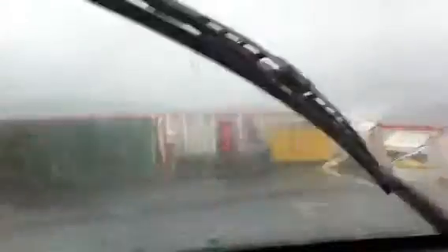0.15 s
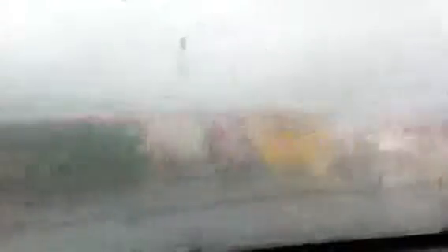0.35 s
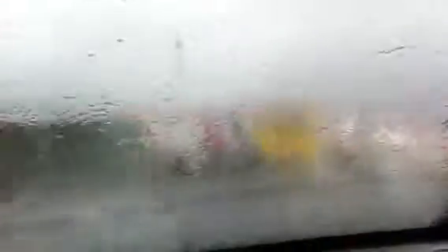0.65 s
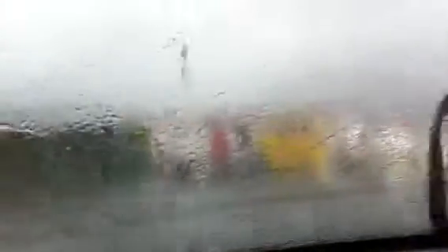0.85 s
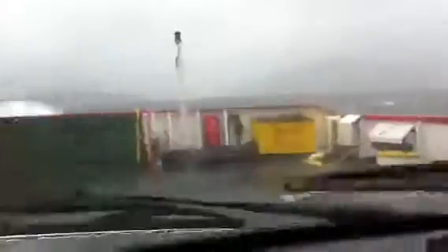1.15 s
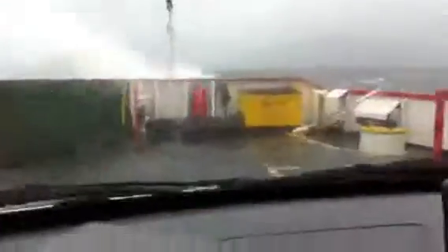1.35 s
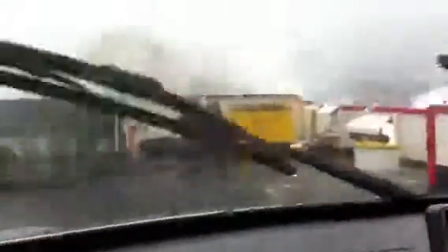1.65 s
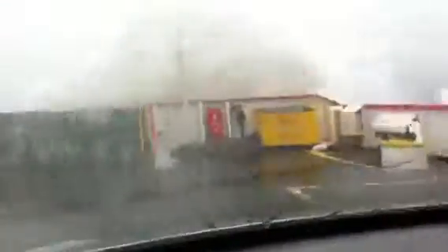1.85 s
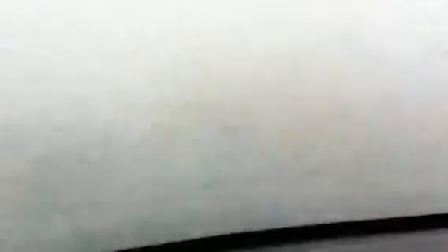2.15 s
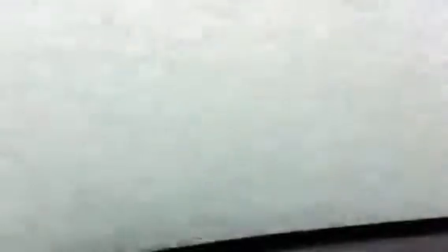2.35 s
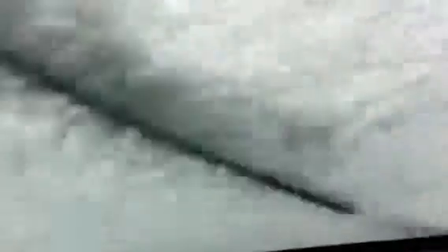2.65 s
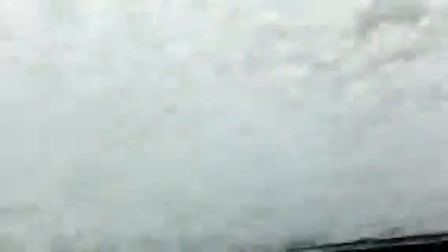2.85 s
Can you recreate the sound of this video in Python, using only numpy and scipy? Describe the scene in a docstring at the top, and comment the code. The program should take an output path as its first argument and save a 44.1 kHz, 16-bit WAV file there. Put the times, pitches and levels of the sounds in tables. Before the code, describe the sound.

Inside a car on a ferry deck, sea spray hisses across the windscreen, thins to scattered droplets and wiper knocks, then a heavier sheet slams the glass and drums on the body over a low ship's hum.

```python
"""Sea spray on a windscreen, heard inside a car on a ferry deck in a storm: two sheets hit the glass.
Spray is a dense random train of impacts coloured by the glass; large drops are short noise splats.
The second sheet brings heavy slugs of water that slap the glass, drum on the body and boom in the roof.
Wipers thump at each turn (decaying modes plus scuff) over the ship's low hum (coloured noise and bands).
One microphone in the car: the water has a short cabin tail, and both channels are alike."""
import sys
import numpy as np
from scipy import signal
from scipy.io import wavfile
from scipy.ndimage import uniform_filter1d

SR = 44100
rng = np.random.default_rng(int(sys.argv[2]) if len(sys.argv) > 2 else 0)


def volts(x):
    """Linear amplitude factor 10**(x/20) for a level x in dB, scalar or array-like."""
    e = np.asarray(x, float) / 20
    return 10 ** e


def unload_audio(sound):
    """Save the sound as a 16-bit wav file, at the path given as the first command line argument."""
    columns = np.transpose(np.atleast_2d(sound))
    # keep every value between -1 and 1, then stretch to whole-number steps
    steps = np.round(np.clip(columns, -1, 1) * 32767)
    wavfile.write(sys.argv[1], SR, steps.astype(np.int16))


N = 132300  # samples, 3 s

# ship's hum through the car, relative spectrum: f/Hz, density/(dB per Hz)
HUM_SPECTRUM = [(12, -83), (20, -67), (76, -5.5), (93, -14.5), (113, 4.5), (222, -2.5), (254, -1),
                (303, -11), (327, -10), (499, -12), (540, -23), (617, -18.5), (2000, -35.5), (2600, -80),
                (4400, -120)]
HUM_LEVEL_DB = -36.5 - 5
# steady fuzzy bands of the hum: f/Hz, width/Hz, level/dB
HUM_BANDS = [(297.5, 13, -50.5), (407.5, 12, -67.5), (505.7, 31, -54)]
# the two lowest bands waver in strength, often together: t/s, lower level/dB, upper level/dB
HUM_LOW_LEVELS = [(0.0, -75, -34), (0.08, -46, -45), (0.15, -64, -75), (0.21, -37, -53), (0.25, -51, -38),
                  (1.12, -40, -39.5), (1.14, -49, -53), (1.36, -41, -40), (1.4, -60, -51),
                  (2.08, -37.5, -44), (2.2, -79, -69), (2.31, -22, -42), (2.36, -40, -50), (2.4, -51, -40)]
# place of those two bands: f/Hz, width/Hz, trim added to the level/dB
HUM_LOW_BANDS = [(106.8, 10, -2), (153.7, 29, -1.5)]
HUM_WAVER_DB, HUM_WAVER_S = -1, 0.047  # drift of each band; averaging time

# fine spray on the glass: t/s, level/dB, treble against it/dB, low part against it/dB
SPRAY = [(0, -58, -5, -3), (.1, -57.5, -9, -4), (.16, -46.5, -8, -5.5), (.2, -40.5, -10, -8),
         (.22, -36.5, -9.5, -5.5), (.265, -32, -9, -4), (.29, -34.5, -12, -4.5), (.33, -30.5, -7.5, -6),
         (.41, -27.5, -9, -6.5), (.44, -29.5, -3, -5), (.49, -25.5, -8.5, -5), (.535, -30, -7, -3),
         (.555, -25.5, -7.5, -5), (.63, -28.5, -10, -5), (.66, -33, -11, -4), (.69, -41.5, -8, 5),
         (.735, -46, -9.5, -4), (.8, -49.5, -3, -1.5), (.825, -41.5, -10, -2), (.86, -49.5, -3, -5.5),
         (1.3, -47, -8, -4.5), (1.54, -53, -9, 1), (1.64, -53.5, -5, 0.5), (2, -51.5, -5.5, -7.5),
         (2.13, -51, -1.5, 2), (2.18, -43.5, -8.5, -4), (2.21, -35.5, -5, -3), (2.225, -28.5, -8, -5.5),
         (2.26, -25.5, -4.5, -4), (2.36, -28, -1, -1.5), (2.41, -24.5, -0.5, -6.5), (2.46, -20.5, -5, 2),
         (2.515, -27, 1, 5), (2.61, -24.5, -4.5, 1), (2.645, -27, -5, 0), (2.7, -27.5, -4, 0),
         (2.81, -24.5, -6, 1), (2.845, -30, -4, 1), (2.93, -31, -4, 1), (3, -26, -7, 1)]
# colour of a droplet heard through the glass: f/Hz, relative density/(dB per Hz)
GLASS_COLOUR = [(88, -25), (150, -3.5), (231, -9), (361, -1.5), (414, -4.5), (504, -4), (905, -8),
                (998, -6.5), (1530, -8), (2870, -7.5), (5680, -14), (11500, -17.5), (16000, -25.5)]
# handfuls of droplets between the sheets: t/s, boost/dB (half to level, half to treble), length/s
SPRINKLES = [(0.754, 7, 0.021), (0.956, 7, 0.024), (1, 6, 0.022), (1.181, 8.5, 0.021),
             (1.212, 13.5, 0.0091), (1.5, 6.5, 0.05), (1.557, 9.5, 0.02), (1.68, 3, .02), (1.77, 5, 0.015),
             (1.926, 5.5, 0.026)]
SPRINKLE_RISE_S = 0.0042
DROPLETS_PER_S, DROPLET_SPREAD_DB = 10000, 1.5
GUST_DB, GUST_S = 1.0, 0.015  # rms drift of the spray level; averaging time
TREBLE_REF_DB, TREBLE_FROM_HZ = -4.5, 4700  # the table's treble value that leaves the colour as it is
LOW_REF_DB, LOW_UNDER_HZ = -2, 1600  # likewise for the low part
PANE_HZ, PANE_WIDTH_HZ, PANE_DB = 2545, 416, -11.5  # broad ring of the windscreen

# wiper knocks, two at each turn: t/s, level/dB, slope over the modes/(dB per octave),
# scuff against the knock/dB
WIPER_KNOCKS = [(.026, -31, -0.5, -12), (0.048, -33, -1, -11), (0.8193, -21.5, 3.5, -20),
                (.827, -14.5, -13, -35), (1.607, -23.5, -8.5, -15.5), (1.641, -28.5, -6, -32)]
# modes of a knock: f/Hz, level/dB, t60/s
WIPER_MODES = [(180.3, -4.5, 0.24), (288.6, -6.5, 0.14), (387, -12, 0.1), (466, -6.5, 0.049),
               (542, -12, 0.14), (620, -16, 0.076)]
WIPER_RISE_CYCLES = 1.1
SCUFF_RISE_S, SCUFF_T60_S, SCUFF_HZ, SCUFF_WIDTH_HZ = 0.005, 0.08, 1350, 1300

# single large drops: t/s, level/dB before the common trim
DROPS = [(0.2706, -21.5), (0.3192, -13.5), (1.2424, -31.5), (1.277, -31), (1.3175, -32), (1.3583, -32)]
DROP_T60_S, DROP_TRIM_DB, DROP_LOW_HZ, DROP_TOP_HZ = 0.019, -3.5, 3500, 11000

# heavy water: t/s, drum on the body level/dB, boom of the roof level/dB,
# slap on the glass level/dB before its trim
SLUGS = [(2.38, -38, -51, -28), (2.412, -35, -27, -24), (2.454, -22, -30, -25), (2.49, -20, -40, -12),
         (2.516, -16.5, -29, -22.5), (2.548, -25.5, -24.5, -12.5), (2.584, -19, -20.5, -24),
         (2.636, -22.5, -31.5, -24.5), (2.65, -23, -23.5, -27), (2.818, -15, -16, -29),
         (2.85, -22.5, -22.5, -25), (2.936, -23.5, -30, -31), (2.978, -22, -23, -24),
         (3.0, -17.5, -33, -28)]
# colour of the drumming body: f/Hz, relative density/(dB per Hz)
BODY_COLOUR = [(47, -47), (80, -46), (157, -13), (288, 0.5), (319, -4), (360, -1.5), (546, -5), (950, -7),
               (1020, -11.5), (2780, -22), (5000, -29), (6500, -63), (11000, -120)]
SLUGS_PER_S, SLUG_SPREAD_DB, SLUG_RISE_DB_PER_S = 2200, 1.5, 245
BOOM_HZ, BOOM_WIDTH_HZ = 162, 36
SLAP_HZ, SLAP_WIDTH_HZ, SLAP_TRIM_DB = 1200, 2200, -5

# the heaviest load of water ends in a boom that sinks in pitch: t/s, f/Hz, level/dB
SINKING = [(2.7, 380, -45), (2.76, 350, -25), (2.81, 310, -21), (2.85, 210, -22), (2.89, 140, -27),
           (2.93, 110, -50)]
SINKING_WIDTH_HZ = 93

WATER_LOW_HZ = 101  # the water carries no deep bass
CABIN_T60_S, CABIN_DB = 0.07, -14


def evened(x):
    """Scales to rms 1."""
    return x / np.sqrt(np.mean(x ** 2) + 1e-20)


def curve(table, axis):
    """One column of a time table, interpolated per sample."""
    rows = np.array(table)
    return np.interp(np.arange(N) / SR, rows[:, 0], rows[:, axis])


def add(mix, s, sound):
    """Mixes a sound in at a time in seconds."""
    part = mix[round(s * SR):][:len(sound)]
    part += sound[:len(part)]


def butter(x, order, hz, kind):
    """Causal Butterworth filter."""
    return signal.sosfilt(signal.butter(order, hz, kind, fs=SR, output="sos"), x)


def butter_both_ways(x, hz, kind):
    """Second-order Butterworth run forwards and backwards, so the part stays in phase."""
    return signal.sosfiltfilt(signal.butter(2, hz, kind, fs=SR, output="sos"), x)


def colour(x, spectrum, size=8192):
    """Causal minimum-phase filter with the given spectrum."""
    f, db = np.transpose(spectrum)
    hz = np.abs(np.fft.fftfreq(size, 1 / SR))
    level_db = np.interp(np.log(hz + 1), np.log(f + 1), db)
    log_gain = np.log(volts(np.maximum(level_db, -100)))
    taps = np.fft.ifft(np.exp(np.conj(signal.hilbert(log_gain)))).real[:size // 2]
    return signal.oaconvolve(x, taps)[:N]


def resonate(x, hz, width):
    """A resonance of gain 1, fixed or moving, applied twice for steep sides."""
    turn = np.exp(2j * np.pi * np.cumsum(hz * np.ones(len(x))) / SR)
    r = np.exp(-np.pi * width / SR)
    # shift the resonance down to 0 Hz, smooth, shift back
    smooth = signal.lfilter([(1 - r) ** 2], [1, -2 * r, r * r], x / turn)
    return 2 * (turn * smooth).real


def wander(seconds):
    """Slow random drift of rms 1: noise averaged twice."""
    size = max(round(seconds * SR), 1)
    once = uniform_filter1d(rng.standard_normal(N), size)
    return evened(uniform_filter1d(once, size))


def impacts(per_s, spread_db):
    """Random train of impacts of either sign, a few of them large."""
    hit = rng.random(N) < per_s / SR
    size = rng.exponential(1, N)
    sign = rng.choice([-1., 1.], N)
    return hit * sign * volts(spread_db * np.minimum(size, 5))


def hum():
    """The ship's hum in the car: low rumble with a few fuzzy bands, each wavering."""
    out = volts(HUM_LEVEL_DB) * evened(colour(rng.standard_normal(N), HUM_SPECTRUM))
    low_bands = [(hz, width, trim_db + curve(HUM_LOW_LEVELS, axis=k + 1))
                 for k, (hz, width, trim_db) in enumerate(HUM_LOW_BANDS)]
    for hz, width, db in low_bands + HUM_BANDS:
        band = evened(resonate(rng.standard_normal(N), hz, width))
        out = out + band * volts(db + HUM_WAVER_DB * wander(HUM_WAVER_S))
    return out


def spray():
    """Dense droplets in small gusts, heard through the glass, with brightness that changes in time."""
    patter = colour(impacts(DROPLETS_PER_S, DROPLET_SPREAD_DB), GLASS_COLOUR)
    patter = patter + volts(PANE_DB) * resonate(patter, PANE_HZ, PANE_WIDTH_HZ)
    patter = patter / np.std(butter(patter, 4, [1800, 4000], "band"))  # rms 1 in this band
    t = np.arange(N) / SR
    boost_db = sum(db * np.clip((t - s) / SPRINKLE_RISE_S, 0, 1) * np.exp(-((t - s) / length) ** 2)
                   for s, db, length in SPRINKLES)
    treble = butter_both_ways(patter, TREBLE_FROM_HZ, "high")
    low = butter_both_ways(patter, LOW_UNDER_HZ, "low")
    treble_db = curve(SPRAY, axis=2) - TREBLE_REF_DB + boost_db / 2
    low_db = np.minimum(curve(SPRAY, axis=3) - LOW_REF_DB, 2)  # lifted by 2 dB at most
    tilted = patter + (volts(treble_db) - 1) * treble + (volts(low_db) - 1) * low
    return tilted * volts(curve(SPRAY, axis=1) + GUST_DB * wander(GUST_S) + boost_db / 2)


def knock(slope_db):
    """One knock on the glass: decaying sine modes, of which the low ones swell slower."""
    t = np.arange(SR // 4) / SR
    out = np.zeros(len(t))
    for k, (hz, db, t60) in enumerate(WIPER_MODES):
        octaves = np.log2(hz / WIPER_MODES[0][0])
        decay = volts(db + slope_db * octaves - 60 * t / t60)
        rise = np.minimum(t * hz / WIPER_RISE_CYCLES, 1)
        out += decay * rise * np.sin(2 * np.pi * hz * t + k * k)
    return out


def wipers():
    """At each turn the blades flip over with a double knock and a noisy scuff of rubber."""
    out, t = np.zeros(N), np.arange(SR // 4) / SR
    for s, db, slope_db, scuff_db in WIPER_KNOCKS:
        scuff = evened(resonate(rng.standard_normal(len(t)), SCUFF_HZ, SCUFF_WIDTH_HZ))
        scuff = scuff * np.minimum(t / SCUFF_RISE_S, 1) * volts(scuff_db - 60 * t / SCUFF_T60_S)
        add(out, s, volts(db) * (knock(slope_db) + scuff))
    return out


def large_drops():
    """Each large drop is a short bright splat of decaying noise."""
    out, t = np.zeros(N), np.arange(2000) / SR
    for s, db in DROPS:
        noise = rng.standard_normal(len(t))
        add(out, s, volts(db + DROP_TRIM_DB - 60 * t / DROP_T60_S) * noise)
    return butter(out, 1, [DROP_LOW_HZ, DROP_TOP_HZ], "band")


def slugs():
    """Lumps of water slap the glass, drum on the body panels and boom in the roof."""
    # a steep rise up to the first row of the table
    onset_db = SLUG_RISE_DB_PER_S * np.minimum(np.arange(N) / SR - SLUGS[0][0], 0)
    blows = impacts(SLUGS_PER_S, SLUG_SPREAD_DB)
    drum = evened(colour(blows, BODY_COLOUR)) * volts(curve(SLUGS, axis=1))
    boom = evened(resonate(blows, BOOM_HZ, BOOM_WIDTH_HZ)) * volts(curve(SLUGS, axis=2))
    slap = evened(resonate(blows, SLAP_HZ, SLAP_WIDTH_HZ)) * volts(curve(SLUGS, axis=3) + SLAP_TRIM_DB)
    return (drum + boom + slap) * volts(onset_db)


def sinking_boom():
    """Blows of water through a low resonance that slides down."""
    t = np.arange(N) / SR
    blows = impacts(SLUGS_PER_S, SLUG_SPREAD_DB)
    ring = evened(resonate(blows, curve(SINKING, axis=1), SINKING_WIDTH_HZ))
    sounding = (t > SINKING[0][0]) * (t < SINKING[-1][0])
    return ring * volts(curve(SINKING, axis=2)) * sounding


def cabin(x):
    """Short dense tail of the car interior: random echoes that die away."""
    t = np.arange(SR // 8) / SR
    echoes = rng.choice([-1., 1.], len(t)) * (rng.random(len(t)) < 0.3)
    tail = echoes * volts(-60 * t / CABIN_T60_S) * (t > 0.001)
    wet = volts(CABIN_DB)
    reverb = signal.oaconvolve(x, tail / np.linalg.norm(tail))[:N]
    return (x + wet * reverb) / np.sqrt(1 + wet ** 2)


def scene():
    """One microphone in the car: water with the cabin tail, wipers and hum without it."""
    water = spray() + slugs() + sinking_boom() + large_drops()
    water = butter(water, 4, WATER_LOW_HZ, "high")
    mono = cabin(water) + wipers() + hum()
    return np.array([mono, mono])


def top_cut(x):
    """Nothing passes above the cut-off."""
    return signal.sosfilt(signal.butter(12, 16230, fs=SR, output="sos"), x)


def record(dry):
    """Hands over the finished two-channel mix."""
    return top_cut(dry)


dry = scene()
out = record(dry)
unload_audio(out)
```